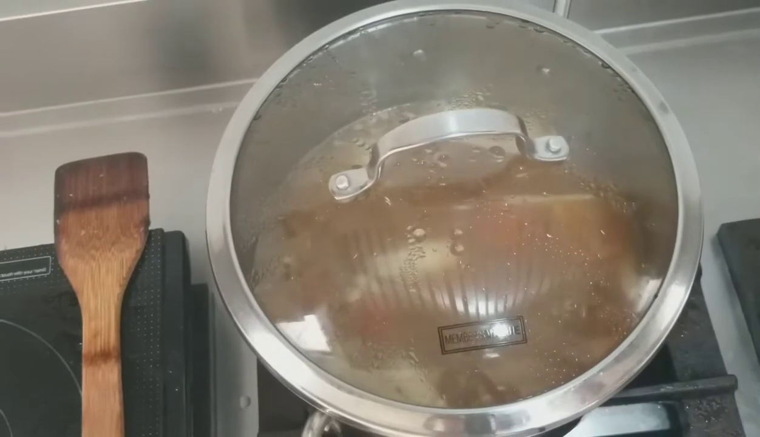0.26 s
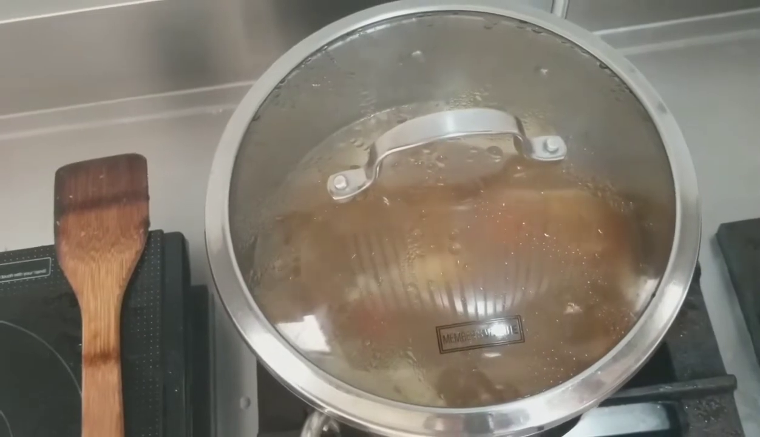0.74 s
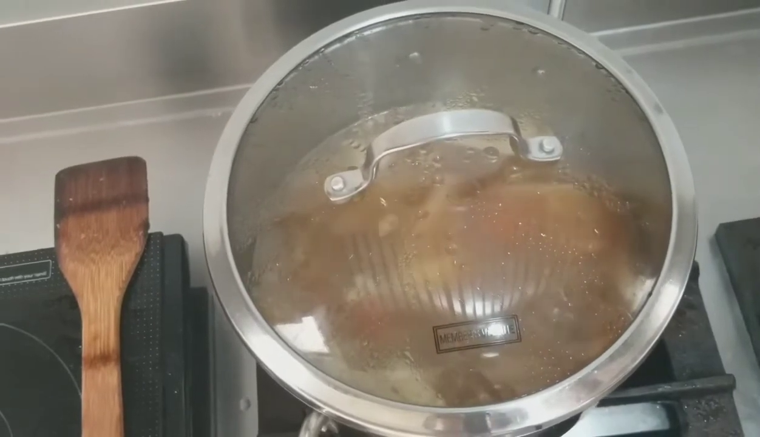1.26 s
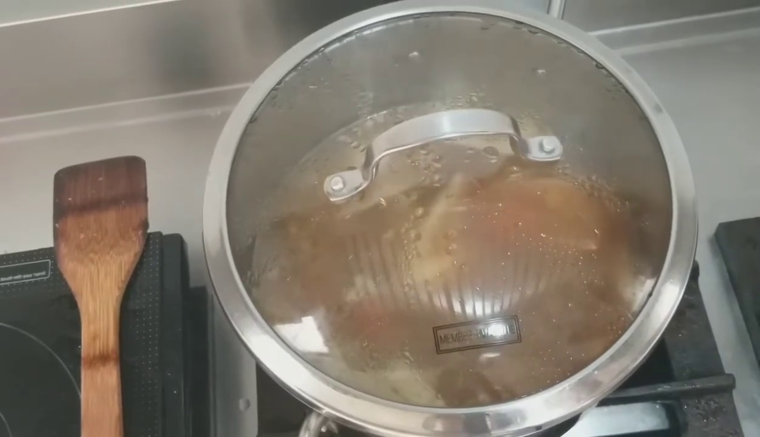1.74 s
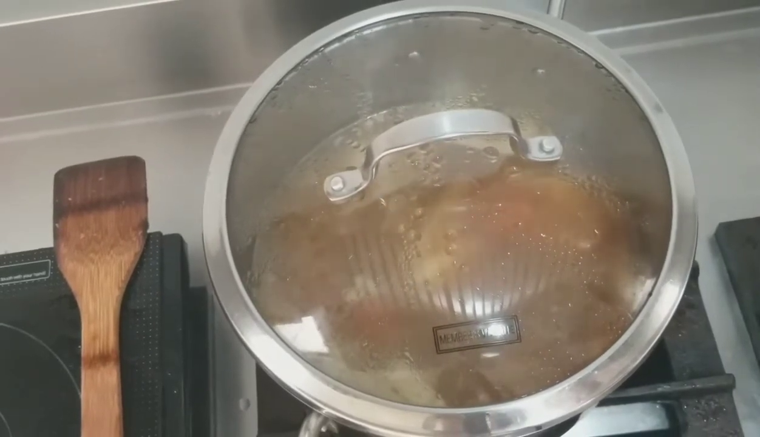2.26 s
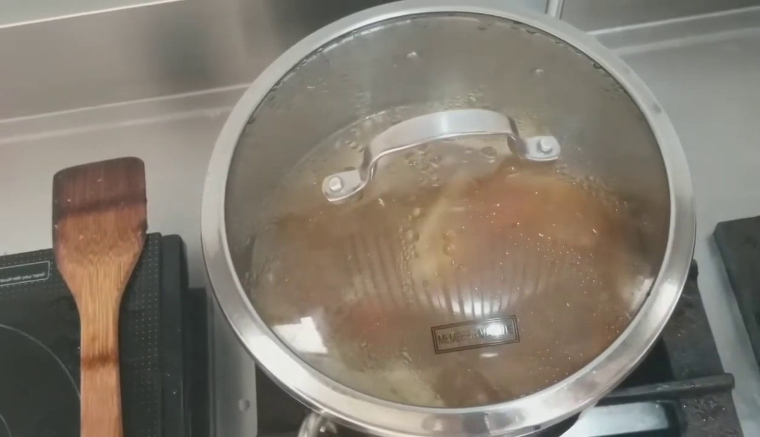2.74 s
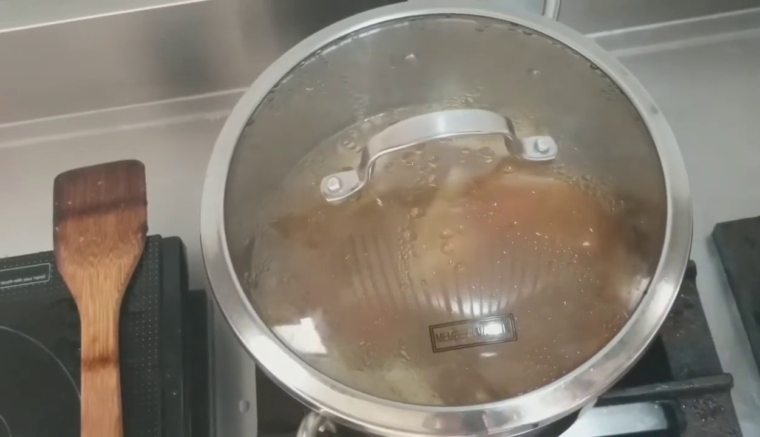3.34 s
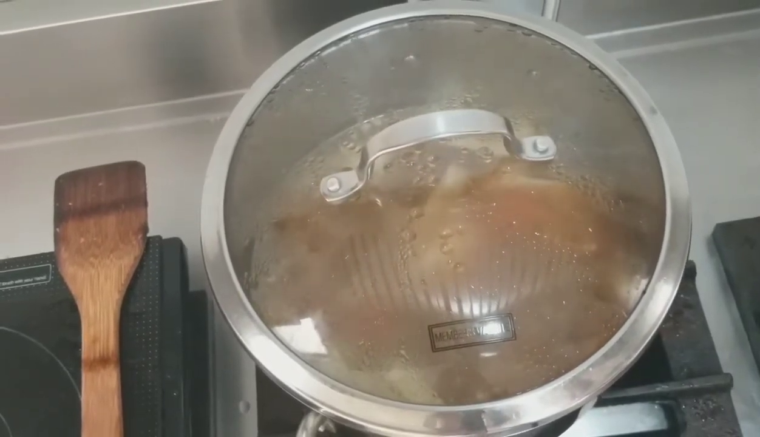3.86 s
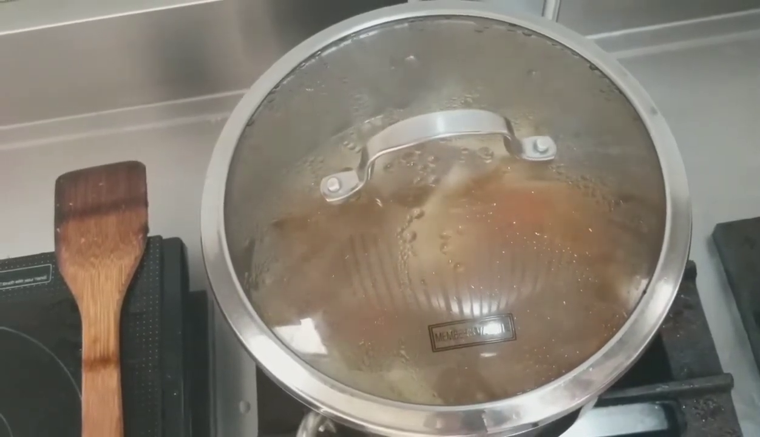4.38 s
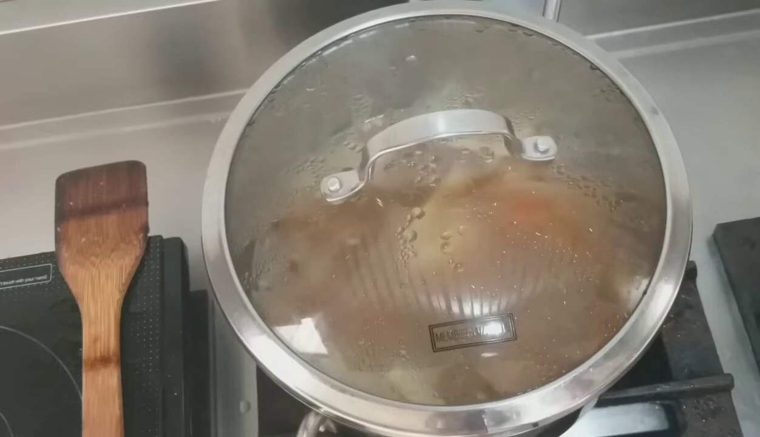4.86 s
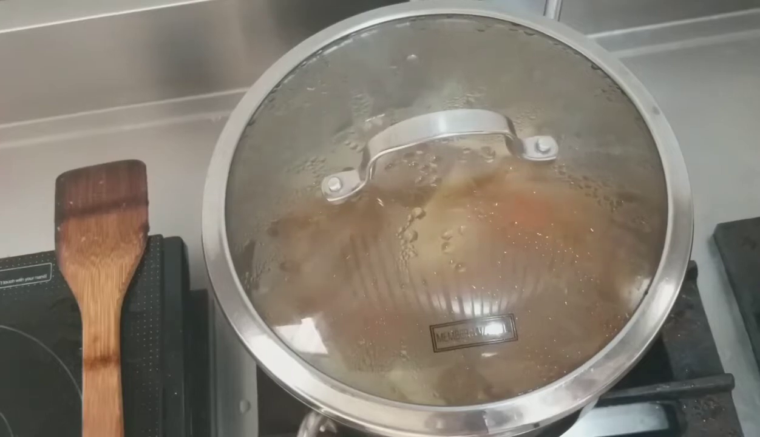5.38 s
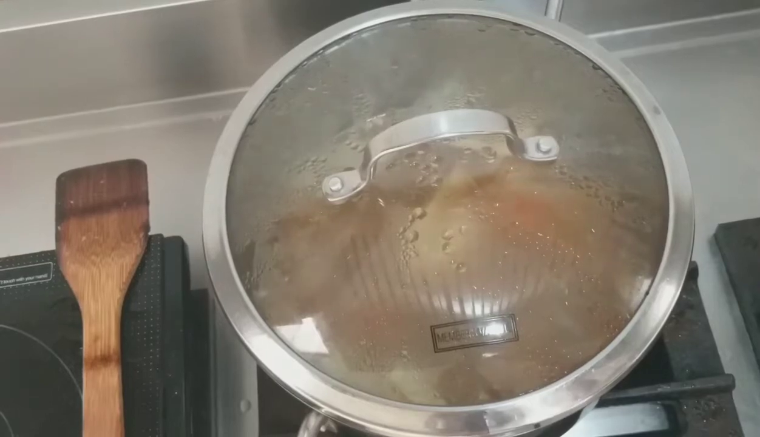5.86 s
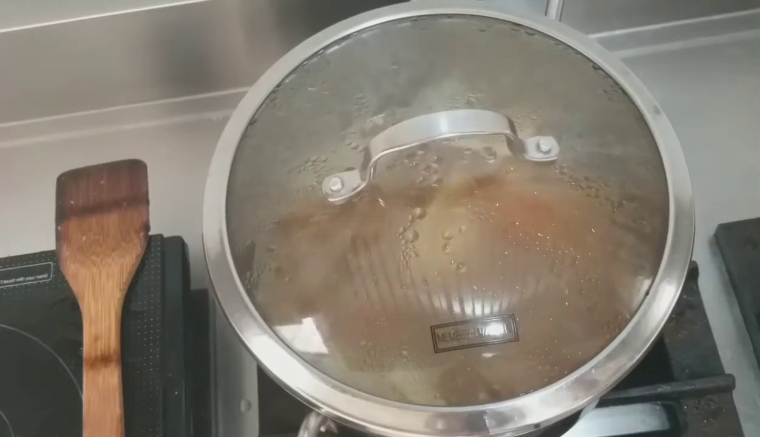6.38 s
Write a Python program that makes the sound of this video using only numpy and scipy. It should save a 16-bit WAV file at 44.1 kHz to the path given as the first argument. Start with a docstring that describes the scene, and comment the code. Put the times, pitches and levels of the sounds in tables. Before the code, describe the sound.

Close to a covered pan on a kitchen stove, fish sizzles steadily from start to finish. Bubbles pop all through the crackling hiss of hot oil, and water spits in sharp, irregular snaps, with the strongest near the middle. The juices simmer below as a quiet, low rumble with soft gulps. The pan and its glass lid add a faint ring, with only a little room echo.

```python
"""Crackle, pops and fine fizz: fish frying in oil and juices under a glass lid, close up in a kitchen.
Steam bubbles burst and crowd into flurries, oil films tear, sauce drops splat; all ring pan and lid.
Underneath, the boiling juices rumble, gulp and seethe.
Water flashes to steam in sharp spits; the loudest make the limiter duck everything briefly."""
import sys
import numpy as np
from scipy import signal
from scipy.io import wavfile
from scipy.ndimage import uniform_filter1d, minimum_filter1d

SR = 44100
rng = np.random.default_rng(int(sys.argv[2]) if len(sys.argv) > 2 else 0)


def digitize_waveform(pressure):
    """Quantize a signal to 16-bit integers and store it at the path in sys.argv[1].

    Rows of a 2-D input are taken as channels; values are limited to [-1, 1].
    """
    field = np.atleast_2d(pressure).T
    bounded = np.clip(field, -1, 1)
    quanta = np.round(bounded * 32767).astype(np.int16)
    wavfile.write(sys.argv[1], SR, quanta)


N = 291942

# Table levels are relative.
# Steady bubble crackle: t/s, level/dB, typical f/Hz
FRYING = [(0, -9, 3820), (.3, -14, 4100), (.52, -12.5, 4080), (.9, -11, 3870), (1.55, -13, 4100),
          (2.2, -12, 4100), (2.5, -12.5, 4350), (3.2, -11, 4100), (3.9, -15, 4160), (4.25, -13, 3900),
          (4.45, -12, 4300), (4.65, -15, 4250), (4.95, -12, 4080), (5.7, -13, 3700), (6.4, -13, 4100),
          (6.62, -13, 3980)]
# Moisture escaping in flurries of bubbles: t/s, length/s, level/dB
FLURRIES = [(0.052, 0.034, -15.5), (0.17, 0.057, -14), (0.356, 0.058, -10), (0.624, 0.082, -16),
            (0.737, 0.045, -16), (0.807, 0.084, -11.5), (0.938, 0.08, -15), (1.12, 0.041, -12.5),
            (1.307, 0.03, -9), (1.411, 0.085, -12), (1.802, 0.051, -13), (1.936, 0.11, -14.5),
            (2.16, 0.076, -16), (2.29, 0.057, -13.5), (2.602, 0.044, -8), (2.775, 0.068, -17.5),
            (2.926, 0.051, -16), (3.12, 0.088, -16), (3.367, 0.021, -19), (3.656, 0.047, -15),
            (4.067, 0.062, -16.5), (4.5, 0.047, -15), (4.767, 0.028, -14), (4.813, 0.057, -7.5),
            (5.267, 0.037, -8), (5.337, 0.035, -14), (5.493, 0.087, -10), (5.704, 0.1, -12),
            (5.904, 0.047, -10), (6.051, 0.031, -15), (6.28, 0.057, -17)]
# Fine fizz of the oil: t/s, level/dB
FIZZ = [(0, -14), (.45, -19), (1.1, -16), (3.95, -18.5), (4.22, -20.5), (4.45, -20), (5.4, -14.5),
        (6.62, -19.5)]
# Spurts of fizz, wet fish on hot metal: t/s, level/dB
SPURTS = [(.082, -27), (.801, -20), (.967, -20), (1.078, -16), (1.62, -26), (1.956, -7), (2.001, -18),
          (2.189, -12), (2.246, -16), (2.345, -6), (3.12, -12), (3.411, -12), (3.915, -15), (4.331, -12),
          (4.422, -13), (4.613, -18), (5.431, -14), (5.718, -22), (6.145, -10), (6.279, -16)]
# Spectrum of a bursting oil film: f/Hz, level/dB
SNAP_SPECTRUM = [(60, -59), (200, -21), (350, -17), (550, -7.5), (700, -8.5), (1100, -1), (2200, -3.1),
                 (3800, 3.5), (6500, 3.2), (9200, -0.3), (10800, 4.5), (12400, 6), (14000, 0.3),
                 (16500, 0.5)]
# Large bubbles bursting: t/s, level/dB, f/Hz
POPS = [(.002, -5.5, 3070), (.076, -2, 3330), (0.191, -11, 3620), (0.234, -16, 2420), (.306, -10, 2530),
        (.37, -15, 3370), (0.382, -13, 4400), (0.406, -5, 3550), (.419, -13, 2280), (0.602, -11.5, 2830),
        (.642, -16, 2870), (0.72, -13.5, 2490), (.812, -16, 3540), (.851, -13, 3700), (0.877, -11.5, 2400),
        (.956, -7, 3970), (1.038, -9, 2760), (1.148, -10.5, 2270), (1.271, -10.5, 2140), (1.335, -12, 2940),
        (1.383, -13, 5130), (1.42, -19, 3770), (1.61, -9, 3380), (1.724, -13.5, 2700), (1.795, -12.5, 2680),
        (1.942, -11, 4080), (2.102, -8, 4360), (2.175, -14, 3470), (2.287, -12, 2850), (2.323, -14, 4540),
        (2.427, -12, 3500), (2.573, -4, 4460), (2.623, -5, 3520), (2.79, -7.5, 3900), (2.953, -21, 3180),
        (3.162, -12, 3600), (3.191, -17.5, 1770), (3.33, -15, 2760), (3.377, -12, 3240),
        (3.49, -10.5, 2490), (3.681, -8.5, 3440), (3.803, -12.5, 4000), (3.846, -14, 3550),
        (4.03, -15, 5000), (4.096, -7, 3570), (4.262, -3, 3370), (4.444, -11, 3740), (4.671, -10, 4230),
        (4.827, -18, 3910), (4.843, -9, 4800), (4.866, -5.5, 3660), (5.031, -12, 3420), (5.119, -13, 3480),
        (5.29, -23, 1500), (5.337, -17, 3700), (5.388, -12, 2450), (5.478, -13, 2760), (5.516, -10, 3350),
        (5.727, -16, 3200), (5.781, -13, 3440), (5.924, -8, 3420), (5.959, -24, 4920), (6.056, -10, 3440),
        (6.109, -18, 3660), (6.322, -15, 2300), (6.343, -21, 3660), (6.395, -11, 3600), (6.451, -18, 2230)]
# Water flashing to steam: t/s, level/dB
SPITS = [(.495, 6), (.672, 5.5), (.783, 1), (.93, 5.5), (1.175, 5), (1.289, 7.5), (1.532, 7.5), (1.828, 8),
         (2.049, 5), (2.393, 6), (2.643, 4.5), (2.726, 8.5), (3.031, 8.5), (3.235, 14.5), (3.431, 5),
         (3.544, 20), (4.096, -3), (4.186, 5), (4.673, 4), (4.845, 6), (5.155, 11), (5.575, 9), (5.843, 10),
         (6.455, 5.5)]
# Sauce drops landing in oil: t/s, level/dB
SPLATS = [(.78, -16.5), (1.838, -15), (2.878, -18), (5.287, -19), (6.451, -16)]
# Spectrum of a splat: f/Hz, level/dB
SPLAT_SPECTRUM = [(100, -21), (300, -15), (700, -6.5), (1700, 6.5), (3000, -3), (6000, -5), (16000, -25)]
# Boil of the juices: t/s, level/dB
BOILING = [(0, -40.5), (.38, -39.5), (.72, -28.5), (1.35, -34), (1.65, -33), (2.2, -28.5), (2.4, -30.5),
           (3.75, -31.5), (4.25, -33.5), (4.45, -30.5), (4.7, -32.5), (5.45, -28), (6.0, -35), (6.3, -34.5),
           (6.62, -42.5)]
# Low resonances of the pan on its hob: f/Hz, nominal width/Hz, level/dB
HOB_MODES = [(91, 6.8, 0), (103, 6.4, 1.5), (119.5, 13.6, 2), (146, 15, -7.5), (184.7, 3.4, 5.5),
             (194.5, 14.6, -1), (219.7, 15, -4.5), (266.4, 17, -6.5)]
# Big steam bubbles in the juices: t/s, length/s, level/dB, f/Hz
GULPS = [(0.893, 0.042, -30, 95.0), (1.061, 0.035, -27.5, 190), (1.595, 0.063, -25, 112),
         (1.68, 0.034, -31, 109), (2.158, 0.048, -26, 123), (2.51, 0.046, -28, 182),
         (2.793, 0.043, -26, 182), (2.986, 0.026, -30, 182), (3.347, 0.057, -34, 190),
         (3.778, 0.047, -27, 187), (4.802, 0.06, -32.5, 190), (5.094, 0.031, -30, 190),
         (5.251, 0.054, -31, 123), (5.453, 0.09, -26.5, 184), (6.25, 0.03, -31, 125)]
# Spectrum of boiling liquid and burner: f/Hz, level/dB
WASH_SPECTRUM = [(20, -35), (38, -20), (52, -3.5), (75, -29), (110, -6), (250, -3.5), (320, -5), (520, -2),
                 (650, -5.5), (1000, -5), (2000, -8), (6000, -55)]
# Resonances of pan and lid: f/Hz, width/Hz, level/dB
PAN_MODES = [(349, 5.3, 3), (398, 11, 3), (530, 19, 1), (593, 19, -4), (780, 68, 0), (992, 50, -1),
             (1380, 45, -2), (1800, 100, 0), (2580, 35, -9), (3010, 40, -3), (3425, 69, -1), (3880, 59, -6),
             (4460, 30, -8), (4870, 40, -5)]
# Microphone port resonances: f/Hz, width/Hz, share added left and subtracted right
PORT_MODES = [(1900, 190, 0.31), (3150, 570, 0.02), (9980, 300, -0.48)]


def crackle(effort_db, per_s, spread_db, below_oct, above_oct, cycles, clump_db, sputter_db, level_db):
    """Steam bubbles burst in clumps, loudest near the typical pitch of the moment."""
    typical_hz = follow(FRYING, column=2)
    pitches_hz = np.geomspace(1500, 7800, 26)
    out = np.zeros(N)
    for pair in pitches_hz.reshape(-1, 2):
        clump = gain_of(clump_db * surges(per_s=44, decay_s=0.04))
        for hz in pair:
            offset = np.log2(hz / typical_hz) / np.where(hz < typical_hz, below_oct, above_oct)
            bursts = clicks(per_s / len(pitches_hz), spread_db, cap=3.56)
            bursts *= clump / (1 + offset ** 2) ** 0.86
            ring = bubble(hz, cycles * rng.uniform(0.53, 2.12), glide=0.039)
            out += signal.oaconvolve(bursts, unit_rms(ring))[:N]
    return unit_rms(out) * gain_of(effort_db + level_db + sputter_db * surges(per_s=66, decay_s=0.019))


def frying_effort_db(edge_s, flurry_db):
    """Crackle level: steady frying plus soft-edged flurries, summed in power."""
    t = np.arange(N) / SR
    power = gain_of(follow(FRYING, column=1)) ** 2
    for start_s, length_s, db in FLURRIES:
        inside_s = length_s / 2 - abs(t - start_s - length_s / 2)
        power += gain_of(db + flurry_db) ** 2 * (1 + np.tanh(inside_s / edge_s)) / 2
    return 10 * np.log10(power)


def bubble(hz, cycles, glide, size=700):
    """A bubble rings for a few cycles; glide raises its pitch as it opens."""
    turns = hz * np.arange(size) / SR
    envelope = (1 - np.exp(-2 * turns)) * np.exp(-turns / cycles)
    stretch = 1 + glide * (1 - np.exp(-turns / cycles / 2))
    return envelope * np.sin(2 * np.pi * turns * stretch)


def fizz(per_s, spread_db, snap_s, haze, flutter_db, sputter_db, spurt_s, spurt_db, level_db, count=24):
    """Tiny oil films snap over a haze of smaller ones; spurts start at once and fade."""
    t = np.arange(4000) / SR
    tears = rng.standard_normal((count, 100)) * np.exp(-t[:100] / snap_s)
    snaps = sum(np.convolve(clicks(per_s / count, spread_db, cap=4), unit_rms(tear))[:N]
                for tear in tears)
    snaps = unit_rms(snaps) + haze * rng.standard_normal(N)
    snaps *= gain_of(flutter_db * surges(per_s=90, decay_s=0.0029))
    snaps *= gain_of(sputter_db * surges(per_s=23, decay_s=0.013))
    power = gain_of(follow(FIZZ, column=1) + level_db) ** 2
    for start_s, db in SPURTS:
        add(power, start_s, gain_of(db + spurt_db) ** 2 * np.exp(-t / spurt_s))
    return unit_rms(colour(snaps, SNAP_SPECTRUM)) * np.sqrt(power)


def pops(crack_cycles, ring_cycles, ring_db, shed_s, shed_db, level_db, shed_count=5):
    """A large bubble cracks open, rings on, then sheds weaker ones of like pitch."""
    out = np.zeros(N)
    for start_s, db, hz in POPS + lesser_pops(typical_hz=4100, spread_oct=0.63, typical_db=-13.5):
        cycles = ring_cycles * np.sqrt(hz / 3600)  # thick sauce damps low bubbles most
        burst = bubble(hz, crack_cycles, glide=0) + gain_of(ring_db) * bubble(hz, cycles, glide=0)
        add(out, start_s, gain_of(db + level_db) * burst)
        for lag, detune in rng.random((shed_count, 2)):
            shed = bubble(hz * (0.88 + 0.24 * detune), cycles, glide=0.03)
            shed *= gain_of(db + level_db + shed_db - 8.5 * lag)
            add(out, start_s + 0.0028 + lag * shed_s, shed)
    return out


def lesser_pops(typical_hz, spread_oct, typical_db, count=50):
    """Mid-size bubbles bursting at random; rows as in POPS."""
    when, pitch, strength = rng.random((count, 3)).T
    hz = typical_hz * 2 ** (spread_oct * (2 * pitch - 1))
    return list(zip(when * N / SR, typical_db + 4 * (strength - 0.5), hz))


def spits(crack_s, jet_s, jet_db, size=1500):
    """A short jet of steam swells and ends in a sharp crack."""
    out, t = np.zeros(N), np.arange(size) / SR
    for at_s, db in SPITS:
        grit, steam = rng.standard_normal((2, size))
        crack = colour(grit * np.exp(-t / crack_s), SNAP_SPECTRUM)
        jet = colour(steam * np.exp(-t[::-1] / jet_s), SNAP_SPECTRUM)
        add(out, at_s, gain_of(db) * crack / abs(crack).max())
        add(out, at_s - size / SR, gain_of(jet_db) * jet)
    return out


def splats(per_s, decay_s):
    """A sauce drop lands and breaks up in a dull, fading patter."""
    envelope = sum(gain_of(db) * hump(at_s, 1 / SR, decay_s) for at_s, db in SPLATS)
    patter = colour(clicks(per_s, spread_db=4.0, cap=1.2), SPLAT_SPECTRUM)
    return unit_rms(patter) * envelope


def rumble(boil_db, level_db):
    """Lumps of steam in the juices drive the pan's low resonances."""
    body = sum(gain_of(db) * resonate_twice(clicks(per_s=900, spread_db=-1.0, cap=5.9), hz, 2 * width_hz)
               for hz, width_hz, db in HOB_MODES)
    return unit_rms(body) * gain_of(boil_db + level_db)


def gulps(rise_share, fall_share, level_db):
    """Each big steam bubble swells and fades at its own low pitch."""
    out, t = np.zeros(N), np.arange(N) / SR
    for start_s, length_s, db, hz in GULPS:
        envelope = hump(start_s + length_s / 2, rise_share * length_s, fall_share * length_s)
        out += gain_of(db + level_db) * envelope * np.sin(2 * np.pi * (hz * t + rng.random()))
    return out


def wash(boil_db, tracking, level_db):
    """Soft seething of liquid and burner, partly following the boil."""
    noise = unit_rms(colour(rng.standard_normal(N), WASH_SPECTRUM))
    return noise * gain_of(level_db + tracking * (boil_db - boil_db.mean()))


def pan_ring(x, level_db):
    """Pan and lid ring at their resonances."""
    return gain_of(level_db) * sum(gain_of(db) * resonate(x, hz, width) for hz, width, db in PAN_MODES)


def surroundings(x, lid_db, lid_t60_s, room_db, room_t60_s, spots=24):
    """Each spot in the pan has its own quick echoes off lid and worktop; the kitchen answers faintly."""
    spot = np.repeat(rng.integers(0, spots, N // 256 + 1), 256)[:N]
    lid = sum(echoes(x * uniform_filter1d(1.0 * (spot == k), size=64), lid_t60_s, size=2400)
              for k in range(spots))
    return x + gain_of(lid_db) * lid + gain_of(room_db) * echoes(x, room_t60_s, size=13000)


def echoes(x, t60_s, size):
    """Diffuse tail of unit energy, 1.5 ms late."""
    t = np.arange(size) / SR
    tail = rng.standard_normal(size) * (t > 0.0015) * gain_of(-60 * t / t60_s)
    return signal.oaconvolve(x, tail / np.linalg.norm(tail))[:N]


def microphone_ports(x):
    """Port resonances set left and right slightly apart."""
    side = sum(share * resonate_twice(x, hz, width_hz) for hz, width_hz, share in PORT_MODES)
    return np.array([x + side, x - side])


def limiter(x, ceiling_db, release_s):
    """Gain drops about 1 ms ahead of each peak over the ceiling, then creeps back."""
    over_db = np.maximum(20 * np.log10(abs(x).max(0) + 1e-9) - ceiling_db, 1e-6)
    fade = np.arange(N) / SR / release_s
    held_db = np.exp(np.maximum.accumulate(np.log(over_db) + fade) - fade)
    return x * gain_of(uniform_filter1d(minimum_filter1d(-held_db, size=61), size=61))


def clicks(per_s, spread_db, cap):
    """Random clicks of either sign; level is spread_db times a capped exponential draw."""
    amplitude = gain_of(spread_db * np.minimum(rng.exponential(1, N), cap))
    return amplitude * rng.choice([-1, 1], N) * (rng.random(N) < per_s / SR)


def surges(per_s, decay_s):
    """Random jumps that die away; centred, rms 1."""
    jumps = rng.uniform(0.44, 1, N) * (rng.random(N) < per_s / SR)
    level = signal.lfilter([1], [1, -np.exp(-1 / (decay_s * SR))], jumps)
    return unit_rms(level - uniform_filter1d(level, size=4000))


def hump(peak_s, rise_s, fall_s):
    """Exponential rise and fall, height 1."""
    late_s = np.arange(N) / SR - peak_s
    return np.exp(-np.minimum(np.maximum(-late_s / rise_s, late_s / fall_s), 20))


def colour(x, spectrum, size=4096):
    """Minimum-phase filter: clicks keep their sharp front."""
    hz, db = np.transpose(spectrum)
    bin_hz = abs(np.fft.fftfreq(size, 1 / SR))
    log_gain = np.log(gain_of(np.interp(np.log(bin_hz + 1), np.log(hz), db)))
    taps = np.fft.ifft(np.exp(np.conj(signal.hilbert(log_gain)))).real
    return signal.oaconvolve(x, taps[:size // 2])[:len(x)]


def resonate(x, hz, width_hz):
    """Resonance of peak gain 1."""
    return signal.lfilter(*signal.iirpeak(hz, hz / width_hz, SR), x)


def resonate_twice(x, hz, width_hz):
    """Two equal resonances in series."""
    return resonate(resonate(x, hz, width_hz), hz, width_hz)


def follow(rows, column):
    """Table column interpolated to every sample."""
    columns = np.transpose(rows)
    return np.interp(np.arange(N) / SR, columns[0], columns[column])


def add(mix, start_s, sound):
    """Mix in place."""
    part = mix[max(round(start_s * SR), 0):][:len(sound)]
    part += sound[:len(part)]


def gain_of(db):
    """dB to amplitude."""
    return 10 ** (np.asarray(db) / 20)


def unit_rms(x):
    """Scale to rms 1."""
    return x / np.sqrt(np.mean(x ** 2) + 1e-20)


def scene():
    """Frying, echoes and wash ring the pan; the juices rumble and gulp below."""
    effort_db = frying_effort_db(edge_s=0.0085, flurry_db=1.0)
    boil_db = follow(BOILING, column=1)
    oil = crackle(effort_db, per_s=2600, spread_db=3.0, below_oct=0.39, above_oct=0.46, cycles=2.15,
                  clump_db=1.1, sputter_db=0.98, level_db=-6.0)
    oil += fizz(per_s=1100, spread_db=4.5, snap_s=0.0004, haze=0.84, flutter_db=2.12, sputter_db=0.37,
                spurt_s=0.0076, spurt_db=3.5, level_db=-0.62)
    oil += pops(crack_cycles=1.37, ring_cycles=5.0, ring_db=-2.0,
                shed_s=0.008, shed_db=-10, level_db=9.5)
    oil += splats(per_s=3000, decay_s=0.017)
    oil += spits(crack_s=0.00052, jet_s=0.014, jet_db=-21.0)
    pan = surroundings(oil, lid_db=-2.5, lid_t60_s=0.043, room_db=-10.5, room_t60_s=0.32)
    pan += wash(boil_db, tracking=0.81, level_db=-33)
    pan += pan_ring(pan, level_db=-5.0)
    pan += rumble(boil_db, level_db=-1.0)
    pan += gulps(rise_share=0.48, fall_share=0.61, level_db=4)
    return microphone_ports(pan)


def record(dry, highpass_hz=42, lowpass_hz=15690):
    """Peak limiter, bass roll-off, band limit."""
    limited = limiter(dry, ceiling_db=0.39, release_s=0.038)
    thinned = signal.sosfilt(signal.butter(2, highpass_hz, "high", fs=SR, output="sos"), limited)
    lowpass = signal.firwin(2047, lowpass_hz, window=("kaiser", 9), fs=SR)
    return signal.oaconvolve(thinned, lowpass[None], "same")


dry = scene()
out = record(dry)
digitize_waveform(out)
```